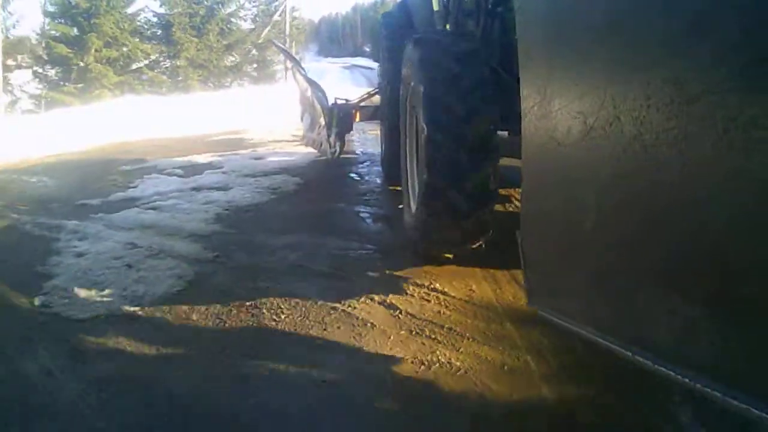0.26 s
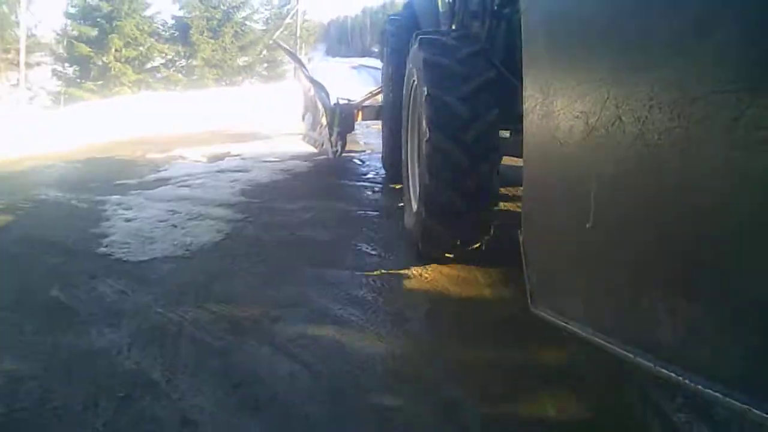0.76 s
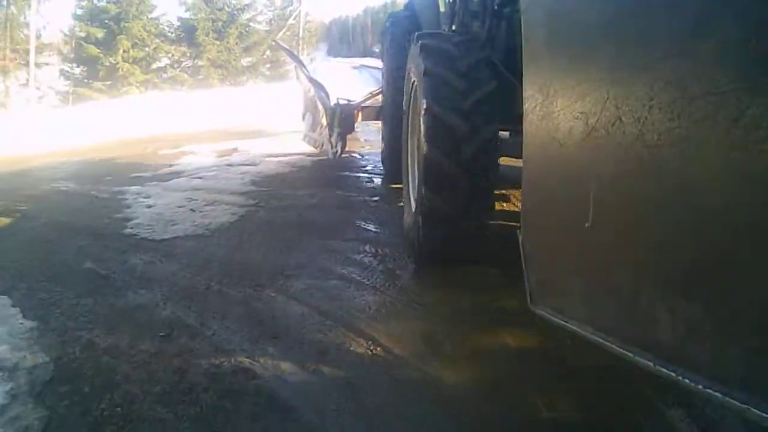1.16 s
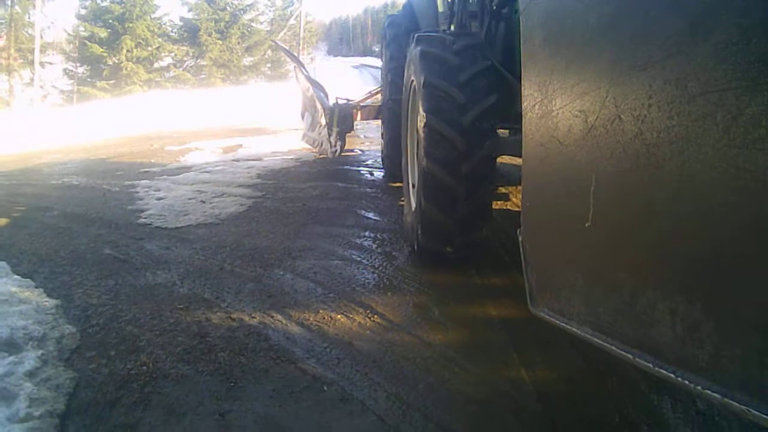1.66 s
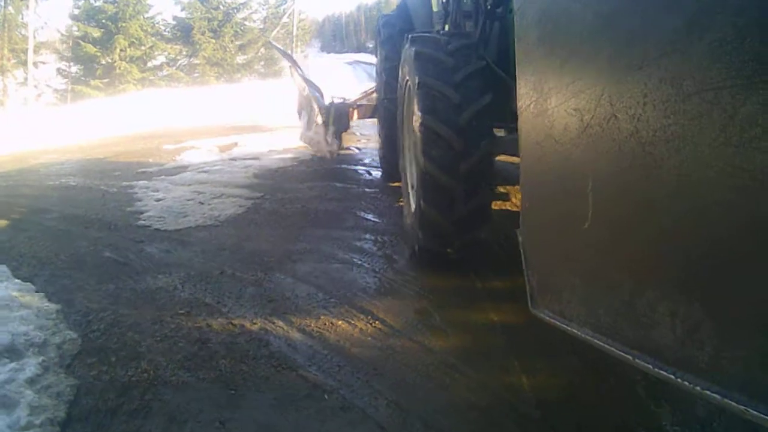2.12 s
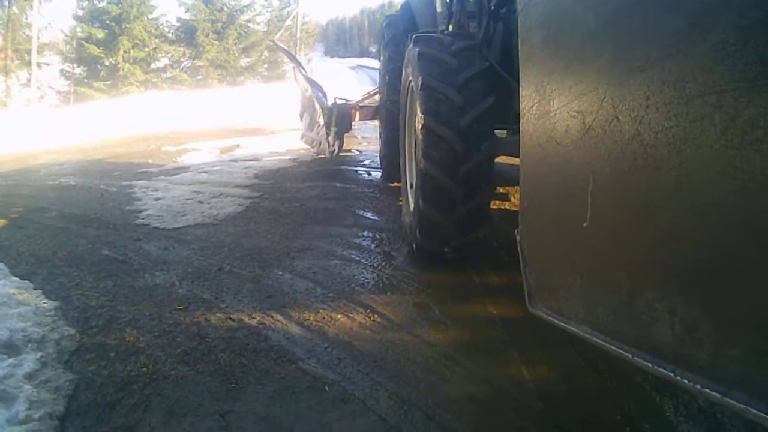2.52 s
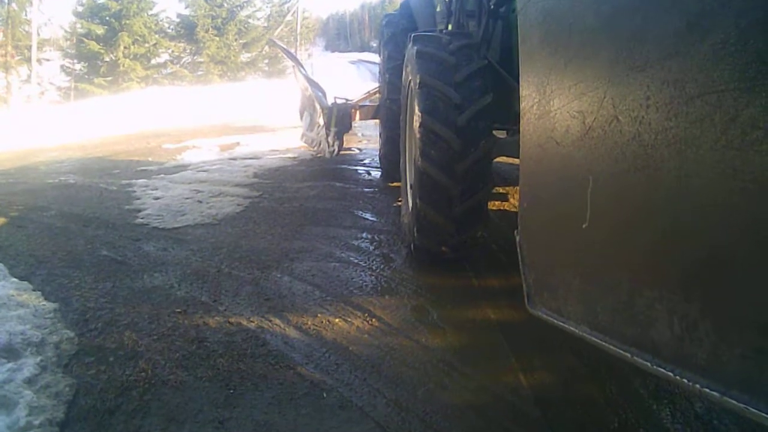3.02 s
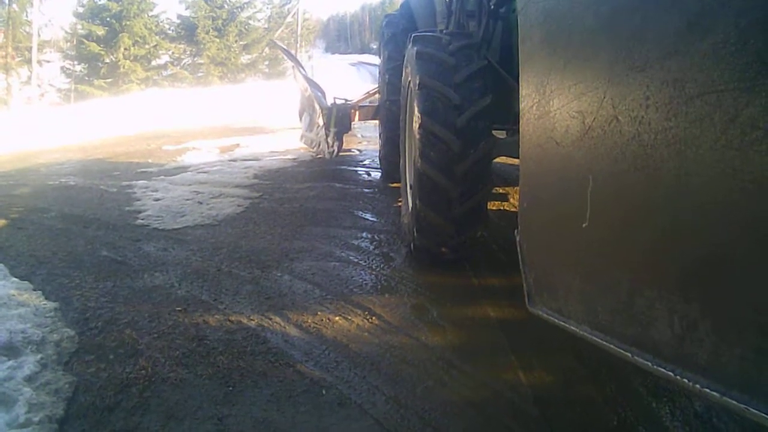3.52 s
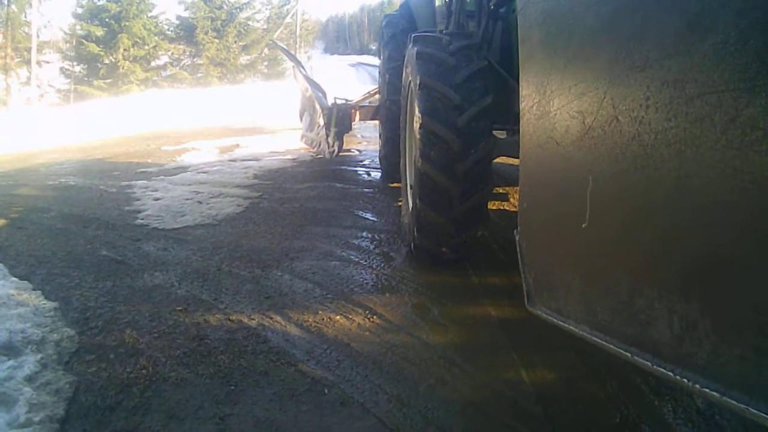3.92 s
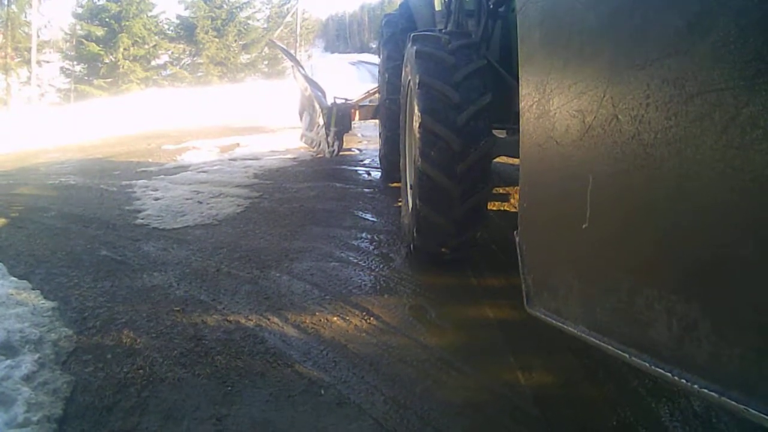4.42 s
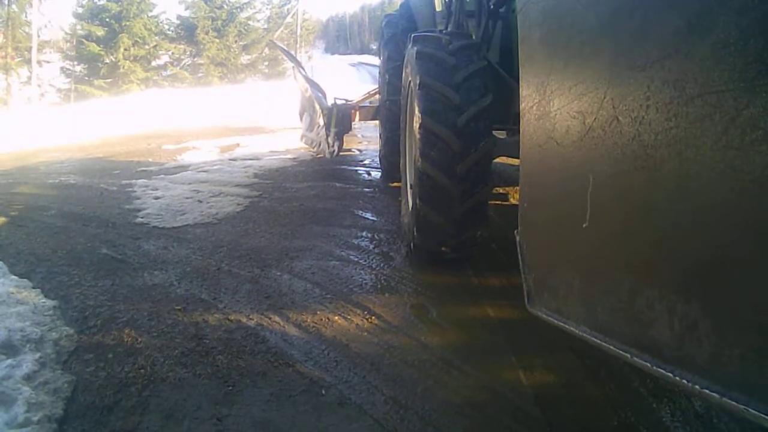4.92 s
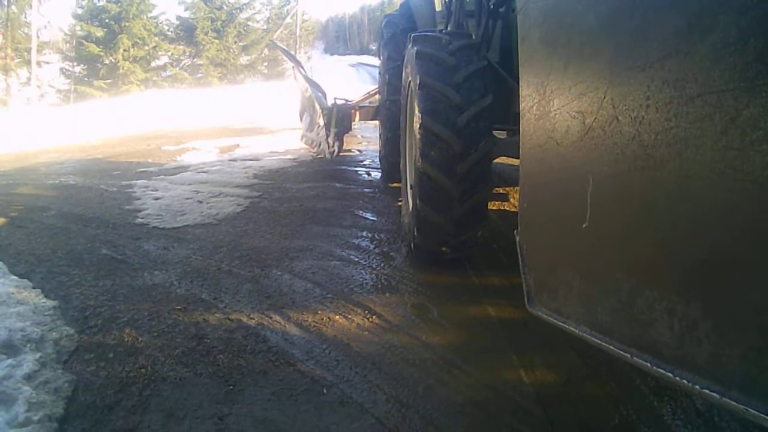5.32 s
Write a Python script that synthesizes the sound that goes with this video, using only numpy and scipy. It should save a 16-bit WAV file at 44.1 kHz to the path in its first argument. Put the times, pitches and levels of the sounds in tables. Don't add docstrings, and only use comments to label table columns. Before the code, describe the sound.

Low engine throb and loose plastic-like rattling, thickest around two seconds as the trailer lurches to a stop, then idling with scattered knocks.

```python
import sys
import numpy as np
from scipy import signal
from scipy.fft import rfft, irfft, next_fast_len
from scipy.io import wavfile
from scipy.ndimage import uniform_filter1d, map_coordinates

SR = 44100
rng = np.random.default_rng(int(sys.argv[2]) if len(sys.argv) > 2 else 0)


def nominal_scale(level):
    x = np.asarray(level, float) / 20
    return 10 ** x


def output_pcm(signal):
    pcm = np.clip(np.atleast_2d(signal).T, -1, 1) * 32767
    wavfile.write(sys.argv[1], SR, np.round(pcm).astype(np.int16))


N = 245617

# (time [s], firing rate [Hz], effort [dB])
ENGINE = [(0.0, 103.1, -11), (0.2, 92.19, -7.5), (0.45, 92.55, -9), (0.56, 91.8, -14.5), (0.8, 77.06, -8),
          (0.91, 72.8, -10.5), (1.07, 70.74, -4), (1.18, 67.08, -12.5), (1.71, 56.45, -13),
          (1.81, 54.14, 3.5), (1.98, 50.01, -9), (2.1, 47.14, -2.5), (2.29, 46.51, 0), (2.55, 46.0, -8),
          (2.99, 43.88, -12.5), (3.25, 43.8, -13), (5.57, 43.9, -13)]
# (multiple of firing rate [1], level [dB])
IDLE_ORDERS = [(0.5, -4), (1.5, -7), (2, -7), (2.5, -21), (3, -20)]
# (time [s], slow bounce [dB], mount swing [dB])
BUMPS = [(0.05, -16, -8), (0.22, -13.5, -2), (0.418, -6, -12.5), (0.62, -22, -6), (1.02, -20.5, -9),
         (1.27, -30.5, -14), (1.848, -13.5, -4.5), (2.1, -21, -11), (2.298, -11, -4), (2.54, -33, -4.5),
         (2.7, -28, -7), (2.93, -22, -9.5), (3.21, -16, -10), (4.071, -24.5, -7.5), (4.45, -27, -10.5),
         (5.42, -26.5, -10), (5.57, -15, -3.5)]
# (frequency [Hz], density [dB per Hz])
BOUNCE = [(2, -30), (6, 0), (18, 0), (30, -20), (60, -60), (120, -160)]
# (frequency [Hz], width [Hz], level [dB])
MOUNT = [(46, 9, -2), (68.15, 16, -8.5), (107, 36, -13)]
# (frequency [Hz], density [dB per Hz])
DRONE = [(60, -42), (120, -3), (300, 0), (450, -8), (700, -15.5), (950, -32), (1050, -34.5), (1300, -10),
         (1550, -22.5), (1700, -32.5), (2200, -33), (3100, -47), (3500, -49.5), (4000, -75), (6000, -120)]
# (frequency [Hz], width [Hz], level [dB])
WHINE = [(797, 22, -6), (1085, 40, -1), (1246, 9, 6)]
# (time [s], length [s], chatter [dB], tick [dB])
SPELLS = [(0.039, 0.28, -10.5, -13.5), (0.331, 0.11, -15.5, -24), (0.446, 0.037, -12, -19.5),
          (0.509, 0.11, -15.5, -26.5), (0.645, 0.032, -21.5, -38.5), (0.842, 0.02, -18.5, -37),
          (1.008, 0.099, -17, -19), (1.155, 0.071, -17.5, -30.5), (1.574, 0.06, -22, -33.5),
          (1.776, 0.11, -14, -20), (1.959, 0.53, -9, -9.5), (2.524, 0.065, -19, -26.5),
          (2.623, 0.089, -12, -13.5), (2.739, 0.15, -25, -24.5), (2.931, 0.1, -17, -30.5),
          (3.164, 0.27, -17, -21), (3.53, 0.064, -19.5, -26.5), (3.595, 0.22, -14, -16.5),
          (3.889, 0.13, -20, -23), (4.074, 0.049, -19, -20.5), (4.254, 0.05, -17, -23.5),
          (4.321, 0.06, -22, -36), (4.456, 0.12, -16.5, -23), (4.591, 0.1, -16, -18.5),
          (4.701, 0.03, -18.5, -26), (4.796, 0.051, -20.5, -24.5), (4.954, 0.017, -20, -36),
          (4.981, 0.21, -12, -17.5), (5.358, 0.099, -19, -28.5), (5.453, 0.12, -13, -23.5)]
# (time [s], tick [dB], thud [dB], ring [dB])
HARD_KNOCKS = [(0.0393, -5, -13, -8), (0.0843, -13.5, -5, -5), (0.1248, -9, -13.5, -0.5),
               (0.189, -16.5, -16.5, -4.5), (0.4346, -13.5, -10.5, -6), (0.7458, -28.5, -15.5, -24),
               (0.8546, -28, -6, -16.5), (0.918, -29, -22.5, -28), (1.076, -21, -12, -12.5),
               (1.1918, -12, -18, -17), (1.247, -15.5, -3.5, -13), (1.5572, -19, -1, -16),
               (1.6615, -19.5, -7, -23), (1.823, -11, -28, -15.5), (1.964, -3.5, -7, -10.5),
               (1.9963, -9, -7.5, -6), (2.0657, -16, -10.5, -6.5), (2.08, -5, -7, -0.5),
               (2.1197, -7, -11.5, -5.5), (2.2504, -2, -10, 1), (2.2946, -6, -12.5, -1),
               (2.3844, -7.5, -9, -3), (2.4736, -2.5, -12, -15), (2.68, -13, -7.5, -6.5),
               (3.0092, -15.5, -5.5, -16.5), (3.1711, -12, -9, -11.5), (3.6837, -17.5, -5, -17),
               (4.441, -18.5, -5, -15.5), (5.0454, -13, -8.5, -14), (5.39, -20, -9, -22)]
# (frequency [Hz], width [Hz], level [dB])
SHELL = [(110, 62, -4.5), (205, 98, 0), (302.4, 109, 0.5), (523, 150, -4), (797.6, 46, -5),
         (908, 100, -12.5)]
# (frequency [Hz], width [Hz], level [dB])
CAVITY = [(1078, 80, -1.5), (1266, 112, 1.7), (1408, 165, 1.87), (1546, 156, 1.05)]
# (frequency [Hz], width [Hz], level [dB])
LENS = [(1960, 450, 9), (2994, 720, 4.5), (5340, 1900, -7), (7140, 930, -3.5)]
# (frequency [Hz], density [dB per Hz])
HISS = [(2500, -40), (3500, -12), (5200, -13), (6200, -3), (7200, 0), (8200, -6), (9000, -30), (15500, -44),
        (16200, -60)]
# (frequency [Hz], gain [dB])
INPUT = [(4000, 0), (5000, -1.5), (7500, -2), (9000, -12), (12000, -14), (15600, -11), (16200, -50)]

TIGHT_DB = -34


def unit(x):
    return x / np.sqrt(np.mean(x ** 2) + 1e-20)


def along(points, hz):
    f, v = np.transpose(points)
    return np.interp(np.log(hz + 1), np.log(f + 1), v)


def curves(rows):
    s, *columns = np.transpose(rows)
    return [np.interp(np.arange(N) / SR, s, column) for column in columns]


def wobble(rate):
    knots = rng.standard_normal(int(N * rate / SR) + 4)
    return map_coordinates(knots, [np.arange(N) * rate / SR])


def filtered(x, response):
    m = next_fast_len(N + SR // 2)
    return irfft(rfft(x, m) * response(np.fft.rfftfreq(m, 1 / SR)), m)[:N]


def resonance(f, centre, width, db):
    return nominal_scale(db) * f * width / (centre * centre - f * f + 1j * f * width)


def ringing(x, modes, soft_hz):
    def body(f):
        return sum((-1) ** k * 1j * resonance(f, *mode) for k, mode in enumerate(modes))
    return filtered(x, lambda f: body(f) / (1 + 1j * f / soft_hz) ** 2)


def held(start, length, db, rise, fall, floor_db):
    t = np.arange(N) / SR
    level = np.full(N, float(floor_db))
    for s, hold, top in zip(start, length, db):
        before = np.maximum(s - t, 0)
        after = np.maximum(t - s - hold, 0)
        level = np.maximum(level, top - rise * before - fall * after)
    return level


def mount(f):
    return np.sqrt(sum(np.abs(resonance(f, *mode)) ** 2 for mode in MOUNT))


def firing_orders():
    firing_hz, effort_db = curves(ENGINE)
    turn = 2 * np.pi * np.cumsum(firing_hz) / SR + .35 * wobble(7)
    half_db, three_quarter_db = 2.5, 0.5
    tones = nominal_scale(effort_db + 1.8 * wobble(11)) * mount(firing_hz) * np.sin(turn)
    half_level = nominal_scale(effort_db + half_db + 3.1 * wobble(9))
    tones += half_level * mount(firing_hz / 2) ** 1.6 * np.sin(turn / 2 + .7)
    rocking = mount(firing_hz / 2) * mount(firing_hz * 3 / 4)
    tones += nominal_scale(effort_db + three_quarter_db) * rocking * np.sin(turn * 3 / 4)
    idle_db = -16 + 0.35 * (effort_db + 13) - 0.25 * (firing_hz - 44)
    for k, db in IDLE_ORDERS:
        bracket_db = 8 * np.exp(-((k * firing_hz - 104) / 14) ** 2)
        tones += nominal_scale(idle_db + db + 2.2 * wobble(6) + bracket_db) * np.sin(k * turn + 1.3 * k)
    return tones


def lurch():
    start_s, level_db, rock_hz, t60_s = 2.216, 3.5, 14, .3
    t = np.maximum(np.arange(N) / SR - start_s, 0)
    return nominal_scale(level_db - 60 * t / t60_s) * np.sin(2 * np.pi * rock_hz * t)


def shake():
    s, bounce_db, swing_db = np.transpose(BUMPS)
    bounce_db = held(s, 0 * s, bounce_db, rise=89.5, fall=62, floor_db=-34)
    swing_db = held(s, 0 * s, swing_db, rise=89.5, fall=62, floor_db=-16.5)
    swing = unit(ringing(rng.standard_normal(N), MOUNT, soft_hz=142.6))
    bounce = unit(filtered(rng.standard_normal(N), lambda hz: nominal_scale(along(BOUNCE, hz))))
    tones = firing_orders() + lurch()
    return np.sqrt(2) * tones + nominal_scale(swing_db - 5.5) * swing + nominal_scale(bounce_db + 5.0) * bounce


def looseness():
    s, length, chatter_db, _ = np.transpose(SPELLS)
    return held(s, length, chatter_db, rise=900.5, fall=261, floor_db=TIGHT_DB)


def drone():
    firing_hz = curves(ENGINE)[0]
    throb = 1 + .25 * np.sin(2 * np.pi * np.cumsum(firing_hz) / SR)
    noise = rng.standard_normal(N) * throb * nominal_scale(2.9 * wobble(25))
    wall = unit(filtered(noise, lambda hz: nominal_scale(along(DRONE, hz))))
    air = unit(ringing(noise, WHINE, soft_hz=1520))
    loose_db = uniform_filter1d(looseness(), size=SR // 8) - TIGHT_DB
    return nominal_scale(-33 + 0.16 * loose_db) * (nominal_scale(9.5) * wall + nominal_scale(1.5) * air)


def chatter(motion, knock_s):
    chatter_db = looseness()
    s, t = np.sort(knock_s), np.arange(N) / SR
    since = t - s[np.maximum(np.searchsorted(s, t) - 1, 0)]
    settle_db = -9 * (1 - np.exp(-(since / 0.035) ** 2))
    recent_power = uniform_filter1d(motion ** 2, size=SR // 10)
    reach = np.abs(motion) / np.sqrt(np.abs(recent_power) + 1e-9)
    hits = rng.random(N) < 700 / SR * reach ** 1.5
    blows = hits * rng.standard_normal(N) * nominal_scale(1.56 * rng.standard_normal(N))
    air = nominal_scale(-13.5) * unit(ringing(blows, CAVITY, soft_hz=1800))
    grit = nominal_scale(-53) * unit(ringing(blows ** 2 * (blows > 1), LENS[3:], soft_hz=9000))
    shell = unit(ringing(blows, SHELL, soft_hz=885))
    return nominal_scale(0.87 * chatter_db + 1.5 + settle_db) * (shell + air + grit)


def strikes():
    start, length, _, tick_db = np.transpose(SPELLS)[..., None]
    hard = np.array(HARD_KNOCKS)
    swing_s, scatter_s, clear_s = .0228, .002, 0.013
    draw = np.clip(rng.standard_normal((4, len(SPELLS), 26)), -1.6, 1.6)
    swing = np.arange(26)
    s = start + swing * swing_s + scatter_s * draw[0] * (swing > 0)
    tick = tick_db + np.where(swing > 0, 2.5 * draw[1], 1) + 2 * (-1) ** swing
    thud = -7 + .3 * tick + 5.5 * draw[2]
    ring = -5 + 0.86 * tick + 6.5 * draw[3]
    to_hard_s = np.abs(s[..., None] - hard[:, 0]).min(axis=-1)
    free = (s < start + length) & (to_hard_s > clear_s)
    rows = np.stack([s, tick, thud, ring], axis=-1).reshape(-1, 4)
    return np.vstack([hard, rows]), np.append(np.ones(len(hard), bool), free)


def knocks(motion, rows, struck):
    s, tick_db, thud_db, ring_db = rows.T
    draw = rng.random((len(s), 16))
    wait = np.cumsum(0.00054 + .0022 * draw[:, :8], axis=1) - .0012
    at = np.clip(np.round((s[:, None] + wait) * SR).astype(int), 0, N - 1)
    against = np.where(motion[at[:, :1]] > -.25, -1, 1)
    size = against * (-1) ** np.arange(8) * (.5 + draw[:, 8:]) * struck[:, None]

    def train(level):
        return np.bincount(at.ravel(), (size * level).ravel(), N)

    thud_level = nominal_scale(thud_db[:, None] + 38.5 - 60 * wait / 0.026)
    ring_level = nominal_scale(ring_db[:, None] + 39 - 60 * wait / 0.033)
    thud = ringing(train(thud_level), SHELL, soft_hz=1100)
    ring = ringing(train(ring_level), CAVITY, soft_hz=2150)
    brief = np.exp(-((wait - .0015) / .0013) ** 2)
    tick = ringing(train(brief * nominal_scale(tick_db + 19.5)[:, None]), LENS, soft_hz=4140)
    starts = np.bincount(at[:, 0], -against[:, 0] * struck * nominal_scale(thud_db - 1), N)

    def upswing(hz):
        early = np.exp(2j * np.pi * hz * 0.0034 - (hz / 110) ** 2)
        return SR / 110 * early * (hz / 25) / (1 + hz / 25)

    return thud + ring + tick + filtered(starts, upswing)


def scene():
    motion = shake()
    rows, struck = strikes()
    mix = motion + drone() + chatter(motion, rows[struck, 0]) + knocks(motion, rows, struck)
    return mix[None]


def band_limit(x):
    return signal.sosfilt(signal.butter(12, 16000, fs=SR, output="sos"), x)


def record(dry):
    hiss = unit(filtered(rng.standard_normal(N), lambda hz: nominal_scale(along(HISS, hz))))
    top = .712
    flat = np.clip(dry[0] + nominal_scale(-76.5) * hiss + 0.0041, -top, top)
    mix = np.clip(filtered(flat, lambda hz: nominal_scale(along(INPUT, hz))), -top, top)
    return band_limit(mix[None])


dry = scene()
out = record(dry)
output_pcm(out)
```